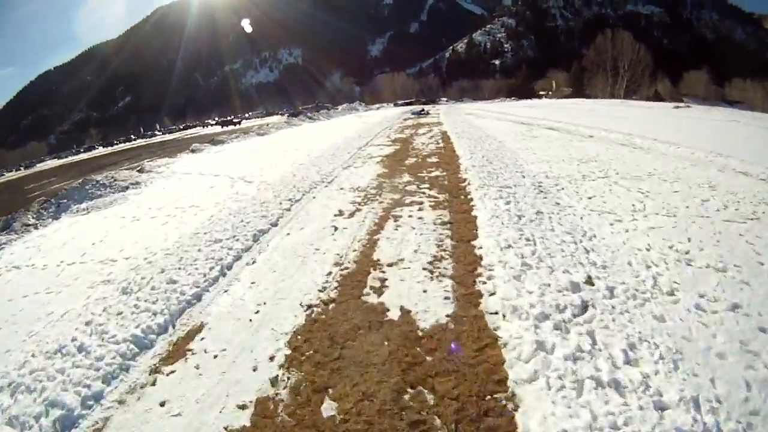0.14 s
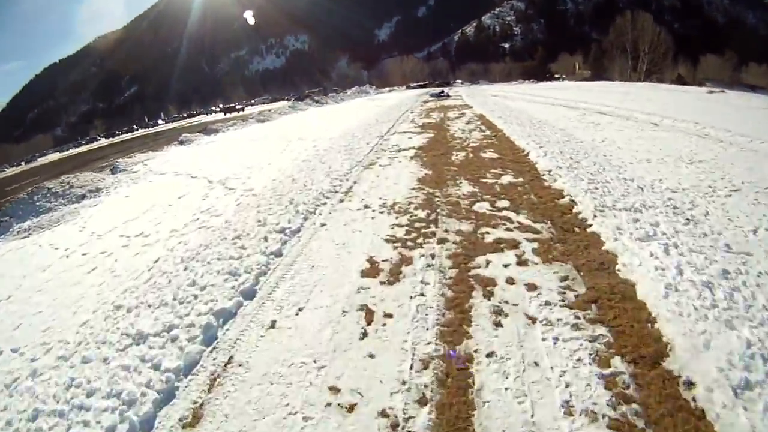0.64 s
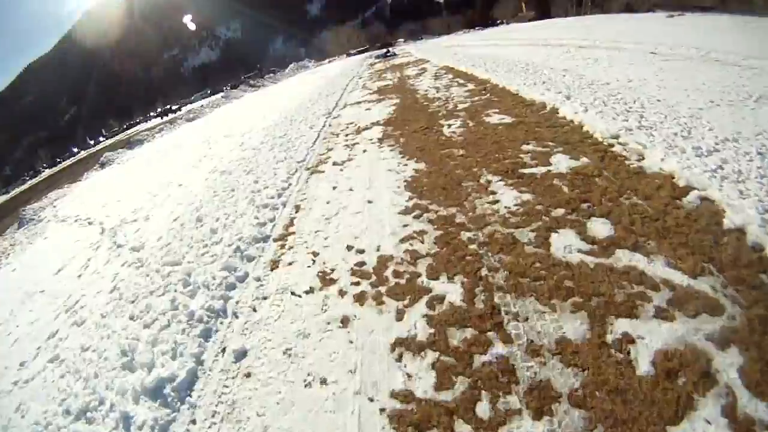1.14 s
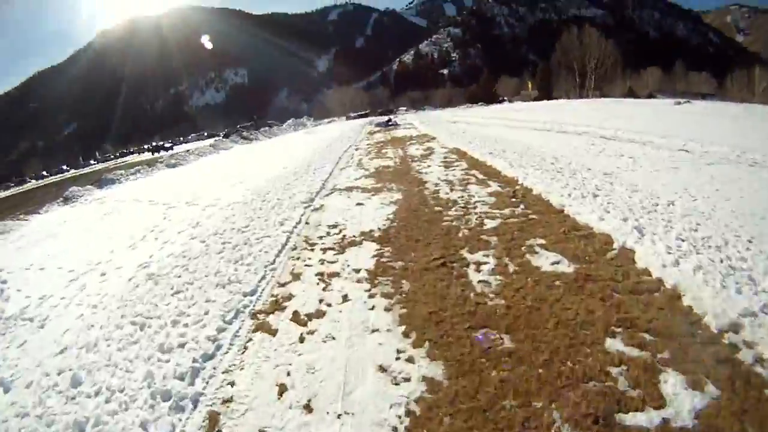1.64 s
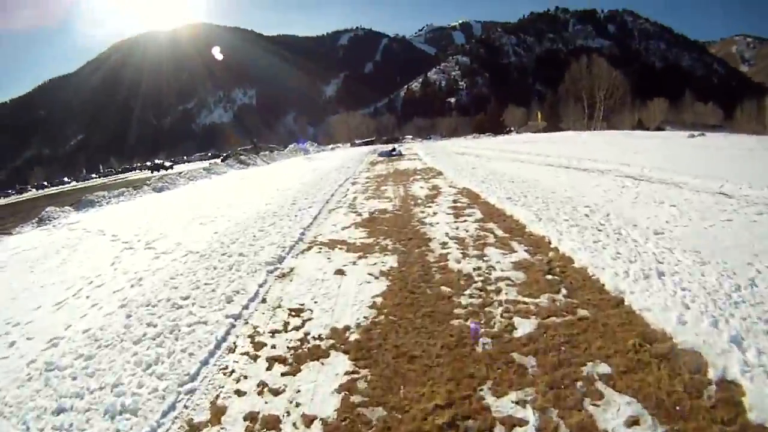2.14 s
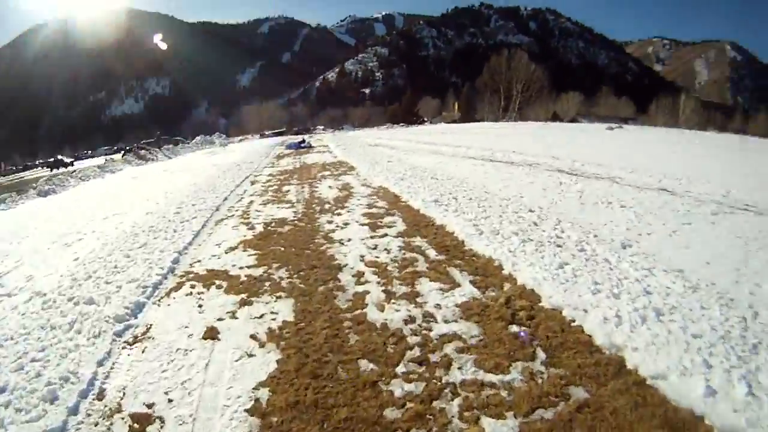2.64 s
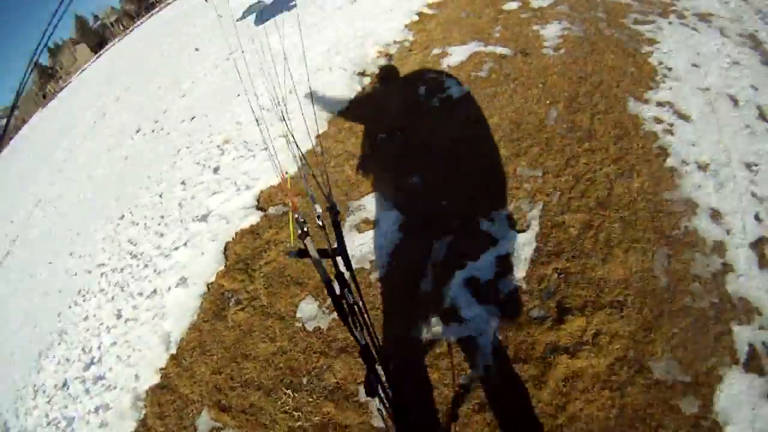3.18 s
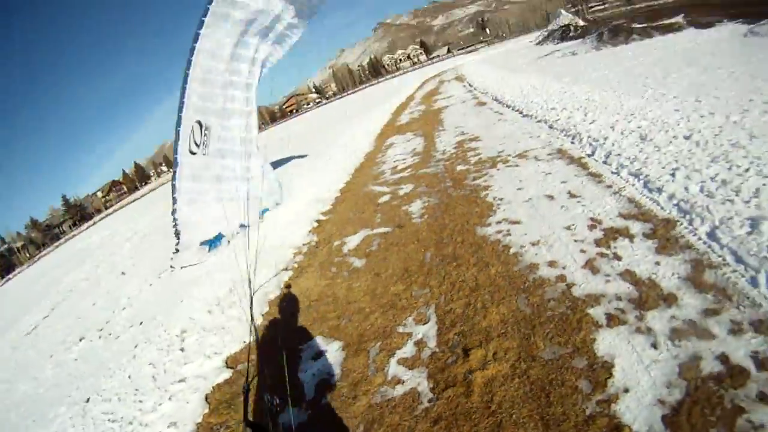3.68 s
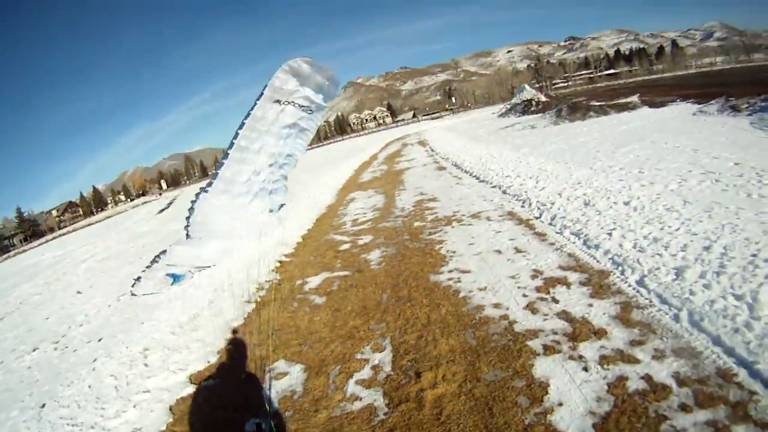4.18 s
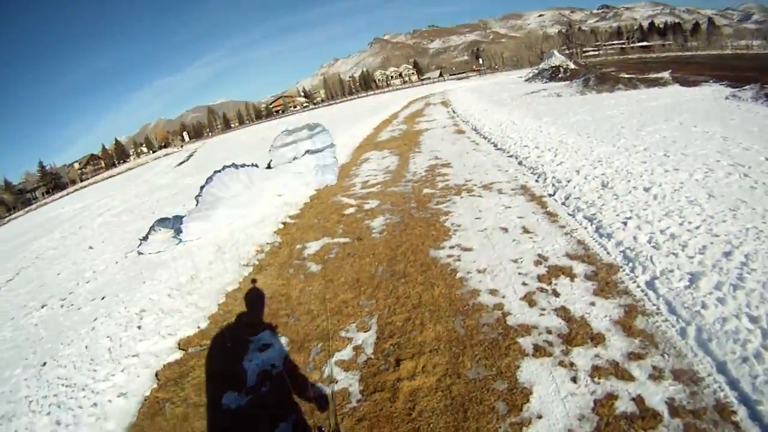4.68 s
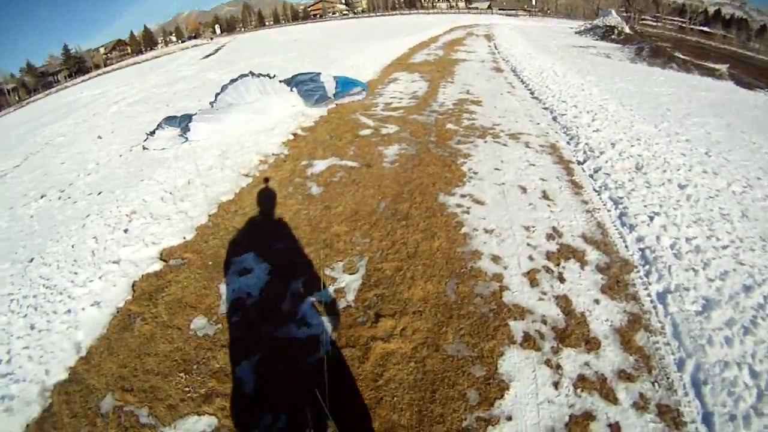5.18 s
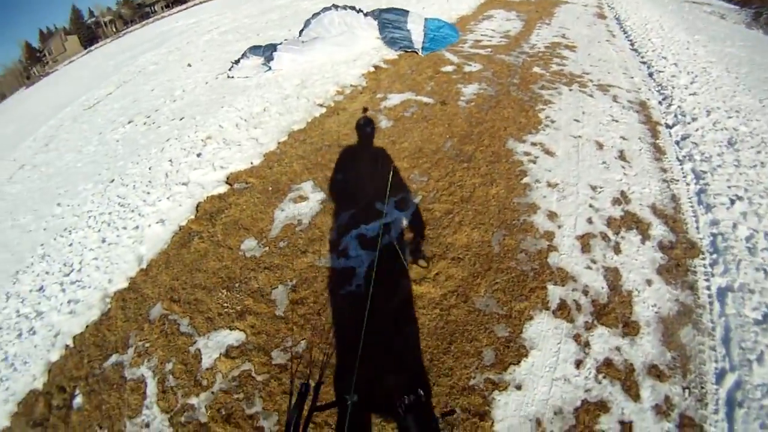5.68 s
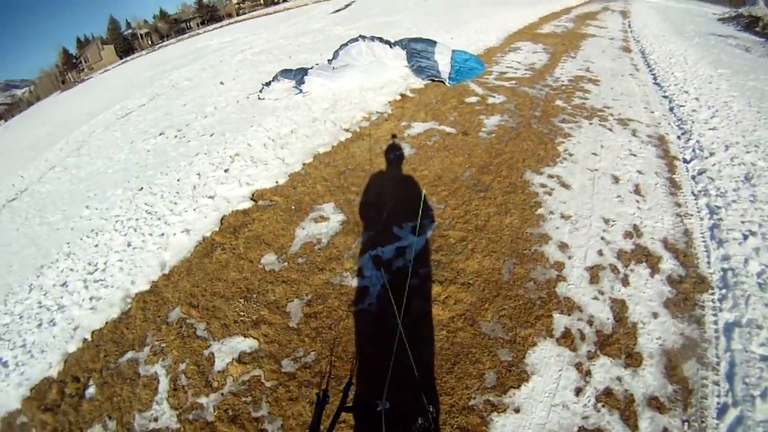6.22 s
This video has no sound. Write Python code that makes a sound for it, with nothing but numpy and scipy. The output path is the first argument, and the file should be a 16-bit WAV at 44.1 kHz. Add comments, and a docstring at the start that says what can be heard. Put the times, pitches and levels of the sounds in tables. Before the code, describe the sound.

A helmet-worn microphone in a plastic shell hears soft windy rush and quick dry creaks, then running steps on snow and grass as low, shaking thuds with hard clacks. A burst of loud knocks distorts, fabric swishes and settles, near silence follows with steady hiss, and a muffled bump and click end it.

```python
"""Wind buffets a camera housing on a pilot's helmet as the pilot slows, lands and runs out on snow and grass.
Its mount rubs and creaks, footfalls jolt it, gear knocks on it, the wing rustles down and a hand grabs it.
Shaped noise makes wind, cloth and hiss; short contacts ring housing modes; damped swings make the jolts;
a leaking pressure step is the grab. One microphone hears it all; a slow converter mirrors the treble."""
import sys
import numpy as np
from scipy import signal
from scipy.fft import rfft, irfft, next_fast_len
from scipy.io import wavfile
from scipy.ndimage import uniform_filter1d, map_coordinates

SR = 44100
rng = np.random.default_rng(int(sys.argv[2]) if len(sys.argv) > 2 else 0)


def bounce(signal):
    """Save signal as a 16-bit WAV file at the path given by the first command-line argument."""
    frames = np.transpose(np.atleast_2d(signal))
    limited = np.clip(frames, -1, 1)
    pcm = np.round(limited * 32767).astype(np.int16)
    wavfile.write(sys.argv[1], SR, pcm)


def linear_from_db(decibels):
    """Turn decibels (scalar or array-like) into linear amplitude factors; 0 gives 1."""
    return 10 ** (np.asarray(decibels, float) / 20)


N = 290178  # length in samples


def unit(x):
    """Scales a sound to rms 1."""
    return x / np.sqrt(np.mean(x ** 2) + 1e-20)


def filtered(x, response):
    """Filters x by a complex response of frequency."""
    size = next_fast_len(x.shape[-1] + 2048)  # room for the tail
    spectrum = rfft(x, size) * response(np.fft.rfftfreq(size, 1 / SR))
    return irfft(spectrum, size)[..., :x.shape[-1]]


def coloured(points):
    """Noise of rms 1 whose spectrum joins (Hz, dB) points on a log frequency axis."""
    point_hz, point_db = np.transpose(points)

    def response(hz):
        return linear_from_db(np.interp(np.log(hz + 1), np.log(point_hz + 1), point_db))
    return unit(filtered(rng.standard_normal(N), response))


def wobble(rate):
    """A smooth random curve with so many random knots a second."""
    knots = rng.standard_normal(int(N * rate / SR) + 4)
    return map_coordinates(knots, [np.arange(N) * rate / SR])


def patchy():
    """Noise that swells in small gusts, slow ones and quick ones together."""
    gust_db = 1.2 * wobble(25) + 1.7 * wobble(120)
    return rng.standard_normal(N) * linear_from_db(gust_db)


def curves(rows):
    """Draws each column after the time as a line with one value per sample."""
    times, *columns = np.transpose(rows)
    return [np.interp(np.arange(N) / SR, times, column) for column in columns]


def soft(force, hz):
    """A yielding contact passes little force above hz."""
    return filtered(force, lambda f: 1 / (1 + 1j * f / hz) ** 2)


def housing(x, low_db, mid_db, upper_db, high_db):
    """The plastic shell rings as damped modes in four groups, each group at its own strength."""
    # Resonances of the shell. Each row: centre in Hz, width in Hz, strength within the group in dB,
    # sign and share at the microphone.
    low_modes = [(243, 8, -10, 0.83), (527.4, 63, 1.6, -1), (860, 40, -1, 1)]
    mid_modes = [(1083, 400, -12, -0.81), (1274, 112.6, 1.76, 1), (1399, 300, -14, 0.56),
                 (1704, 240, -1.5, -0.51), (1822, 350, -10, -0.78)]
    upper_modes = [(2366, 300, 0.26, 0.97), (2654, 400, -0.42, -0.88)]
    high_modes = [(3226, 430, 1, 0.94), (3740, 538, 1.44, -1), (4880, 1000, -6.5, -0.91),
                  (5830, 200, -26.5, 0.46)]
    groups = [(low_modes, low_db), (mid_modes, mid_db), (upper_modes, upper_db), (high_modes, high_db)]
    modes = [(hz, width, db + group_db, sign) for group, group_db in groups for hz, width, db, sign in group]
    hz, width, db, sign = np.array(modes).T
    t = np.arange(SR // 25) / SR
    decay = np.exp(-np.pi * np.outer(width, t))  # a wide mode dies sooner
    ring = (sign * width * linear_from_db(db)) @ (decay * np.cos(2 * np.pi * np.outer(hz, t)))
    return signal.fftconvolve(x, ring)[:len(x)]


def add(track, s, sound):
    """Mixes a sound into the track from second s."""
    part = track[round(s * SR):][:len(sound)]
    part += sound[:len(part)]


def blow(contact_ms, soft_hz, low_db, upper_db, high_db, touch=2.0):
    """A sharp first touch and a dying rattle of contact, rung through the housing; peak 1."""
    t = np.arange(SR // 20) / SR
    rattle_decay = np.exp(-(t * 1000 / max(contact_ms, 0.2)) ** 1.4)
    force = 0.35 * rng.standard_normal(len(t)) * rattle_decay
    force[0] += touch
    force = soft(force, soft_hz)
    ring = housing(force, low_db, 0, upper_db, high_db)
    # part of the blow arrives unrung, more of it for a bright one
    crack_db = -6.5 + 0.85 * min(high_db, 4)
    sound = unit(ring) + linear_from_db(crack_db) * unit(force)
    return sound / np.abs(sound).max()


def wind():
    """Lumpy low buffeting of the housing: deep noise swelling at random along a drawn level."""
    # How hard the wind buffets. Each row: time in seconds, level in dB.
    buffet_levels = [(0.0, -43.5), (0.36, -41), (0.5, -35), (1.05, -35), (1.28, -23.5), (1.45, -31.5),
                     (1.8, -33), (1.92, -21), (2.05, -33.5), (2.5, -37.5), (2.95, -26), (3.2, -43),
                     (3.4, -31.5), (3.72, -41), (3.9, -34), (4.3, -50), (4.68, -48), (4.9, -41.5),
                     (5.5, -43.5), (6.0, -51.5), (6.48, -37), (6.58, -42)]
    # Colour of the buffeting. Each row: frequency in Hz, relative level in dB.
    rumble_colour = [(7.1, -28), (12, 4.5), (27, -2), (41, -8.5), (57, -8.5), (97, -31.5), (155, -35),
                     (192, -35.5), (320, -45), (420, -65), (700, -120)]
    buffet_db, = curves(buffet_levels)
    return linear_from_db(buffet_db) * unit(linear_from_db(2.2 * wobble(15)) * coloured(rumble_colour))


def motion():
    """Air rushes in the middle and upper modes, cloth hisses in the high ones, dense slips rub the middle."""
    # Air past the helmet, before strokes add to it. Each row: time in seconds, rush in dB, cloth hiss in dB.
    air_levels = [(0.0, -50, -56.5), (0.3, -51, -60.5), (0.42, -53.5, -65), (0.6, -50.5, -61.5),
                  (0.82, -59.5, -68), (1.1, -55, -62.5), (1.45, -60, -66.5), (1.85, -58, -65.5),
                  (2.14, -63, -70), (2.42, -61, -69), (2.75, -52, -62), (3.04, -56.5, -64),
                  (3.45, -45, -56), (3.8, -47.5, -56.5), (4.15, -57, -62.5), (4.6, -62, -69),
                  (5.3, -71, -78), (6.0, -76, -78), (6.45, -70.5, -76.5), (6.58, -63, -71.5)]
    # Strokes of the mount rubbing on the helmet. Each row: middle in seconds, level in dB,
    # seconds from the middle until the power has fallen to 1/e.
    rub_strokes = [(0.0, -52.5, 0.051), (0.584, -60, 0.13), (0.916, -55.5, 0.15), (1.086, -47.5, 0.035),
                   (1.232, -50.5, 0.047), (1.356, -44, 0.028), (1.508, -54, 0.11), (1.653, -42, .033),
                   (1.96, -52, 0.084), (2.274, -46, 0.066), (2.498, -54, 0.038), (2.666, -46, 0.043),
                   (2.78, -44.5, 0.035), (2.96, -48.5, 0.043), (3.13, -41, 0.027), (3.29, -43, 0.05),
                   (3.412, -45, 0.048), (3.56, -49.5, 0.09), (3.93, -50, 0.046), (4.28, -52.5, 0.076),
                   (4.7, -58, 0.049)]
    rush_db, cloth_db = curves(air_levels)
    t = np.arange(N) / SR
    stroke_power = sum(linear_from_db(db) ** 2 * np.exp(-((t - s) / half_s) ** 2) for s, db, half_s in rub_strokes)
    stroke = np.sqrt(stroke_power)
    # between strokes the rubbing follows the air in part
    rest = linear_from_db(-64 + 0.4 * (rush_db - rush_db.mean()))

    rush = unit(housing(patchy(), low_db=-12.5, mid_db=-1, upper_db=0.7, high_db=-13.5))
    cloth = unit(housing(patchy(), low_db=-24.5, mid_db=-20, upper_db=-11.5, high_db=3.5))
    slips = (rng.random(N) < 500 / SR) * linear_from_db(3.3 * rng.standard_normal(N))  # some 500 a second
    friction = soft(slips, 2553) + 0.026 * rng.standard_normal(N)
    rub = unit(housing(friction, low_db=-12.0, mid_db=3.0, upper_db=-6.5, high_db=-24.0))

    # each stroke stirs air and cloth too
    rush_level = np.hypot(linear_from_db(rush_db), linear_from_db(-7) * stroke)
    cloth_level = np.hypot(linear_from_db(cloth_db), linear_from_db(-21.5) * stroke)
    return rush_level * rush + np.hypot(rest, stroke) * rub + cloth_level * cloth


def hiss():
    """A steady coloured noise bed of constant level."""
    # Colour of the hiss. Each row: frequency in Hz, relative level in dB.
    hiss_colour = [(53, -17), (90, -5), (748, -15), (1290, -18.5), (2060, -18.5), (3810, -24.5),
                   (5220, -24.5), (5900, -32.5), (7670, -66.5), (13000, -120)]
    return linear_from_db(-63) * coloured(hiss_colour)


def creaks():
    """Each slip of the mount is a short dry tick in the middle modes; runs of them come at an uneven rate."""
    # Single slips, loud and faint. Each row: start in seconds, peak in dB.
    single_slips = [(0.3371, -31.5), (0.4045, -23), (0.4248, -32), (0.4366, -30), (0.6164, -22),
                    (0.638, -22), (0.659, -25), (0.6814, -23.5), (0.7469, -22), (0.7904, -21),
                    (0.8579, -20.5), (1.0617, -30), (1.1942, -24.5), (1.3815, -26.5), (1.4439, -33),
                    (1.5386, -27), (1.6181, -32.5), (1.6369, -26.5), (2.9557, -30), (3.6554, -32.0),
                    (3.837, -31.5), (4.3546, -38.5), (5.0523, -41.5), (5.4423, -47.5), (6.3513, -41.5)]
    # Runs of quick slips. Each row: start in seconds, end in seconds, slips per second,
    # peak in dB before random spread, timing scatter as a share of the gap.
    slip_runs = [(0.4722, 0.49, 152, -29.5, 0.069), (0.4989, 0.52, 130, -29, 0.046),
                 (0.531, 0.552, 102, -28, 0.042), (0.5632, 0.606, 106, -25, 0.049),
                 (1.677, 1.79, 60, -40.5, 0.46), (1.971, 2.03, 49, -42, 0.42),
                 (2.211, 2.36, 38.7, -36.5, 0.41)]
    spread_db = 0.56
    out, slips = np.zeros(N), list(single_slips)
    for start, end, rate, db, scatter in slip_runs:
        chance = rng.standard_normal(size=(12, 2))  # at most 12 slips a run
        times = start + (np.arange(len(chance)) + scatter * np.tanh(chance[:, 0])) / rate
        slips += [(s, db + spread_db * c) for s, c in zip(times, chance[:, 1]) if s < end]
    for s, db in slips:
        tick = blow(touch=0.7, contact_ms=2.3, soft_hz=2600, low_db=-16.5, upper_db=-3.5, high_db=-20.5)
        add(out, s, linear_from_db(db) * tick)
    return out


def jolts():
    """Footfalls swing the camera on its mount: a quick build-up, one pointed swing, a damped shake and a scuff."""
    # Jolts through the helmet. Each row: main swing in seconds, level in dB, swing rate in Hz,
    # rise in ms, direction of the main swing (1 or -1).
    footfalls = [(1.08, -5.5, 33, 7.9, 1), (1.163, -10.5, 25.7, 34, 1), (1.268, -4, 45, 11, 1),
                 (1.367, -8.5, 33.7, 22, 1), (1.576, -10.5, 44.6, 12.2, 1), (1.626, -18, 22.4, 8.1, -1),
                 (1.867, -9.5, 42, 8.2, 1), (2.213, -19.5, 17.8, 22.7, -1), (2.498, -21.5, 40, 31, 1),
                 (2.551, -20, 17, 28, 1), (2.78, -18, 68, 10.5, 1), (2.817, -10, 56, 7, -1),
                 (2.994, -15, 265, 1.2, 1), (3.169, -24, 33, 27, 1), (3.835, -21, 14.4, 26, 1),
                 (3.889, -18.5, 24.1, 9, -1)]
    out, lead = np.zeros(N), 0.08  # seconds of build-up ahead of the main swing
    t = np.arange(SR // 2) / SR - lead
    scuff = coloured([(70, -20), (120, 0.1), (190, -9), (330, -21), (700, -38), (1200, -60)])
    scuff = np.tile(scuff, reps=2)  # enough for a jolt near the end
    for s, db, hz, rise_ms, direction in footfalls:
        t60 = 0.045 + 4.6 / hz  # the shake dies by 60 dB in a fixed time plus so many swings
        round_top = rise_ms / 2000
        decay = linear_from_db(-60 * (np.hypot(t, round_top) - round_top) / t60)
        swell = np.where(t < 0, np.exp(-0.5 * (t * 1000 / rise_ms) ** 2), decay)
        # the mount stiffens at the end of its travel and sharpens the main swing
        point = 0.5 * linear_from_db(db + 4) * np.exp(-(t * hz * 8) ** 2)
        swing = 0.6 * swell * np.cos(2 * np.pi * hz * t) + point
        # harder jolts scuff more than in proportion
        rub = linear_from_db(0.5 * db - 23.5) * swell ** 2 * scuff[round(s * SR):][:len(t)]
        add(out, s - lead, linear_from_db(db) * (np.sign(direction) * swing + rub))
    return out


def knocks():
    """Gear strikes the housing, each knock with its own colour and contact; a duller one is softer."""
    # Each row: start in seconds, peak in dB, brightness (strength of the high modes) in dB,
    # strength of the low modes in dB, contact time in ms.
    gear_knocks = [(1.0782, -23, -9.5, -6, 8.4), (1.0945, -26, -8, -21, 1.9),
                   (1.1043, -24.5, -15.5, -24.5, 3.4), (1.1367, -23.5, 10.5, -23.5, 5.8),
                   (1.1471, -0.5, 3, -16, 2.5), (1.2582, -27.5, -2, 2.5, 6.2), (1.345, -15, -8, -15, 2.1),
                   (1.4243, -31.5, -9, -16, 1.6), (1.43, -30.5, -10, -19, 4.2),
                   (1.5649, -13.0, 12.5, -35, 3), (1.865, -32, -3.5, -22, 2.8),
                   (2.0928, -20, -25, -26, 0.73), (2.5371, -30.5, 4, -27, 2.5), (2.7306, -34, 4, -18, 1.3),
                   (2.756, -29, -14, -3, 5.6), (2.788, -25.5, -24, -18.5, 2.09),
                   (2.7955, -22, -23, -18, 0.83), (2.8051, -6.5, -20.5, -17, 0.7),
                   (2.8218, 11.5, -14, -20, 2.1), (2.8519, -10.5, -10.5, 2.5, 4.6),
                   (2.877, -0.5, -13, -10, 6), (2.927, -25.5, -8, -17.5, 1.4),
                   (2.944, -21.5, -6.5, -12.5, 1.7), (2.9748, -8, -11, -7, 2.5),
                   (2.9826, -6, -16.5, -12, 5.1), (2.9878, -9.5, -16, -8, 3.0), (4.626, -44, -15, -2.5, 8),
                   (4.648, -40.5, -14.5, -3, 5), (4.672, -39.5, -9.5, -9, 0.67),
                   (6.528, -31.5, -1.5, -23.5, 6.5), (6.533, -31, -3, -5, 2.8), (6.541, -33, 22, -5, 1.02)]
    out = np.zeros(N)
    for s, db, bright_db, low_db, contact_ms in gear_knocks:
        upper_db = 1 + 0.45 * bright_db  # the upper modes follow the brightness part of the way
        soft_hz = 8000 * linear_from_db(min(bright_db, 6) * 0.9)
        add(out, s, linear_from_db(db) * blow(contact_ms, soft_hz, low_db, upper_db, bright_db))
    return out


def grab():
    """A hand presses the air inside, holds and lets go: the pressure leaks and overshoots as the shell flexes."""
    press_ms, held_ms, release_ms = 3.6, 2.5, 2.4
    leak_hz = 32  # the pressure leaks away below this
    flex_hz, flex_db, flex_t60 = 424, -14, 0.016  # t60 in seconds
    t = np.arange(SR // 10) / SR
    push = np.interp(t * 1000, np.cumsum([0, press_ms, held_ms, release_ms]), [0, 1, 1, 0])
    sound = linear_from_db(-0.6) * filtered(soft(push, 680), lambda hz: 1j * hz / (leak_hz + 1j * hz))
    sound += linear_from_db(flex_db - 60 * t / flex_t60) * np.sin(2 * np.pi * flex_hz * t)
    out = np.zeros(N)
    add(out, 6.5275, -sound)
    return out


def scene():
    """One microphone feeds both channels."""
    mono = wind() + motion() + hiss() + creaks() + jolts() + knocks() + grab()
    return np.array([mono, mono])


def roll_off(x):
    """The treble ends steeply here."""
    return signal.sosfilt(signal.butter(12, 16440, fs=SR, output="sos"), x)


def record(dry):
    """Gain control, overload and a slow converter that holds each sample; the channels end slightly unlike."""
    # the gain ducks a few ms after an overload and recovers
    t = np.arange(SR // 4) / SR
    lag = np.exp(-t / 0.021) - np.exp(-t / 0.0031)
    overload = np.maximum(np.abs(dry) - 0.9, 0)
    excess = signal.fftconvolve(overload, lag[None] / lag.sum(), axes=1)[:, :N]
    ducked = dry / (1 + 17 * np.abs(excess))
    clipped = ducked / (1 + np.abs(ducked / 1.7) ** 8) ** (1 / 8)

    # sampling mirrors the band about the rate; holding weighs all by a sinc
    hold_hz, top_hz = 12000, 15600
    band = filtered(clipped, lambda hz: 1 / (1 + (hz / 5700) ** 24))
    mirrored = band * (1 + 2 * np.cos(2 * np.pi * hold_hz * np.arange(N) / SR))
    held = filtered(mirrored, lambda hz: np.sinc(hz / hold_hz) * (hz < top_hz))

    # loud passages carry a low noise of opposite sign left and right; a faint hiss differs on each side
    power = np.abs(uniform_filter1d(held ** 2, size=1024))
    opposed = filtered(rng.standard_normal(N), lambda hz: 1 / (1 + hz / 150)) * [[1], [-1]]
    side_noise = linear_from_db(-7.5) * power ** 1.6 / (power + 0.02) * opposed
    faint = filtered(rng.standard_normal((2, N)), lambda hz: hz / (hz + 250) / (1 + hz / 3000))
    mix = held + side_noise + linear_from_db(-67.5) * faint
    return roll_off(np.clip(mix, -1, 1))


dry = scene()
out = record(dry)
bounce(out)
```